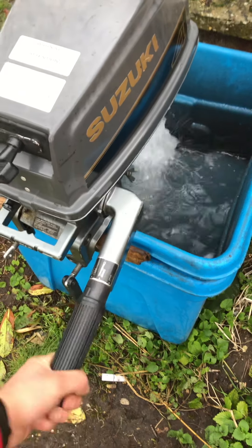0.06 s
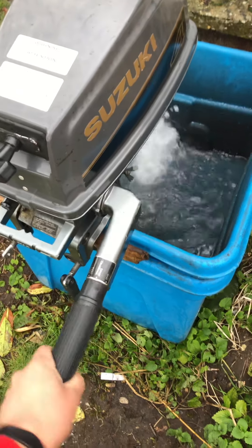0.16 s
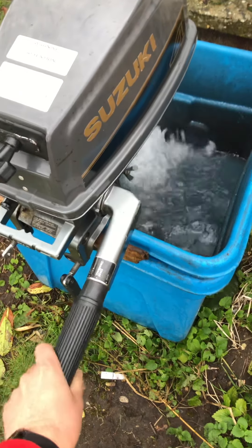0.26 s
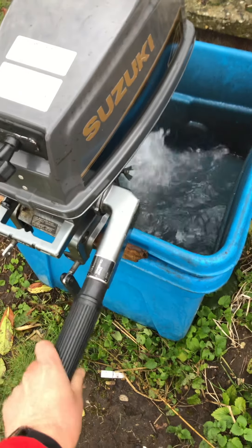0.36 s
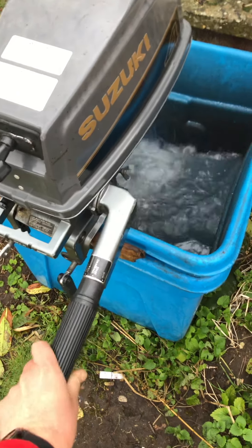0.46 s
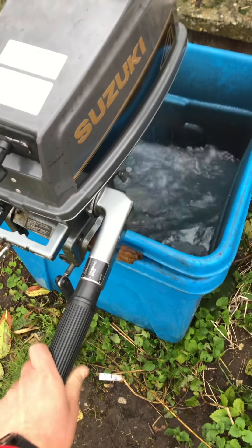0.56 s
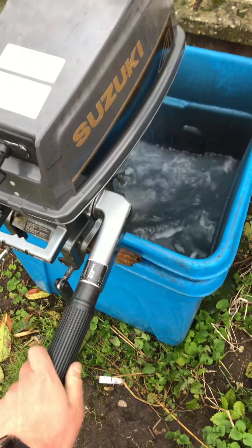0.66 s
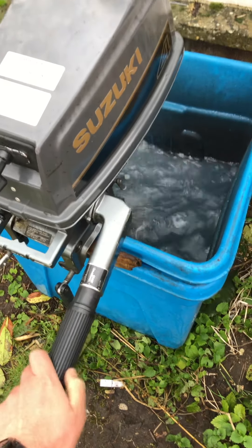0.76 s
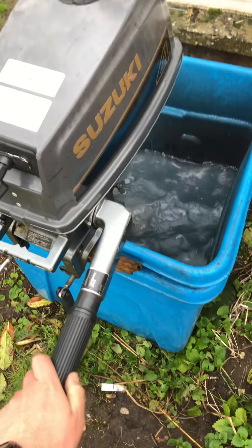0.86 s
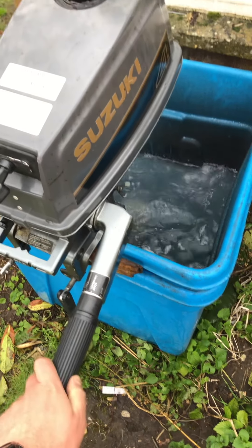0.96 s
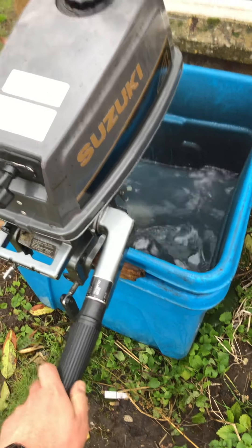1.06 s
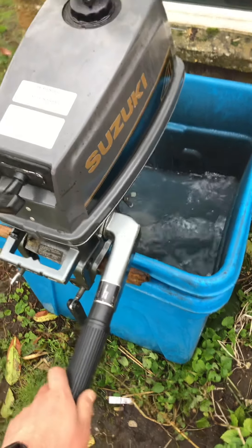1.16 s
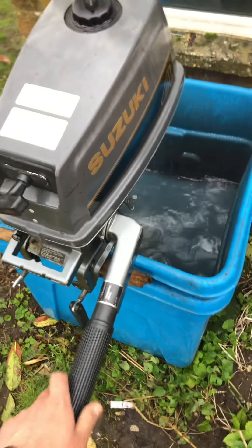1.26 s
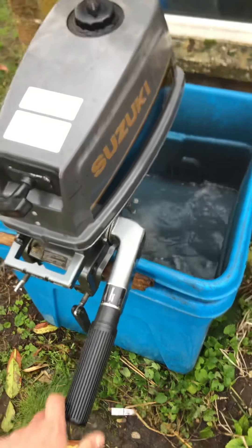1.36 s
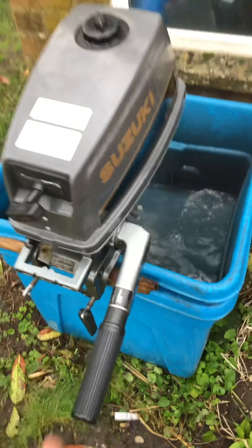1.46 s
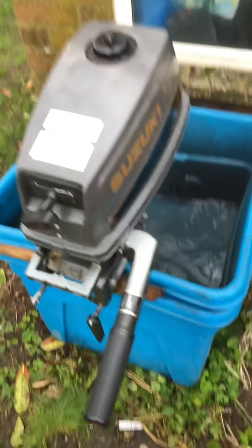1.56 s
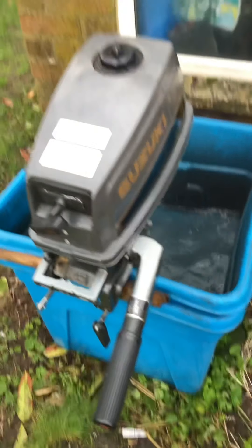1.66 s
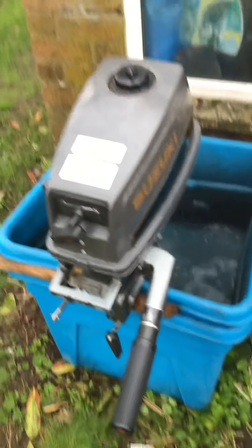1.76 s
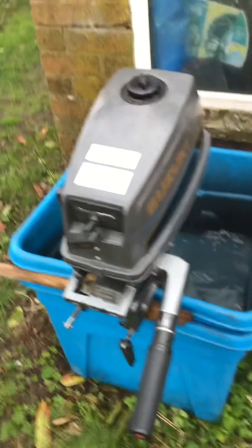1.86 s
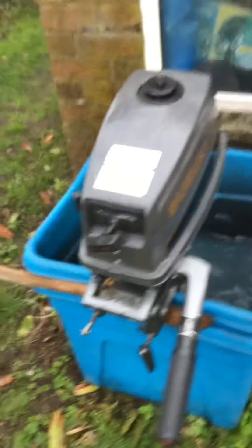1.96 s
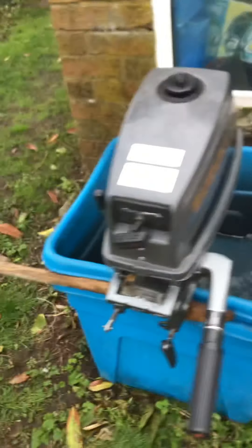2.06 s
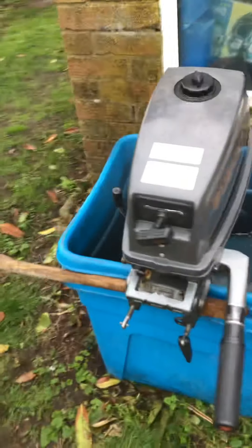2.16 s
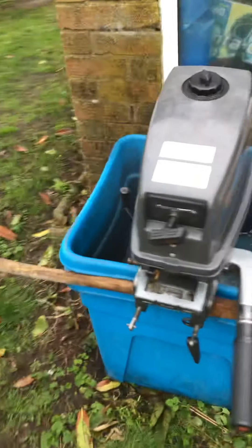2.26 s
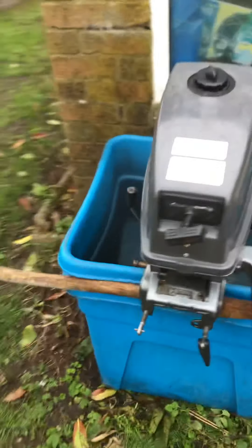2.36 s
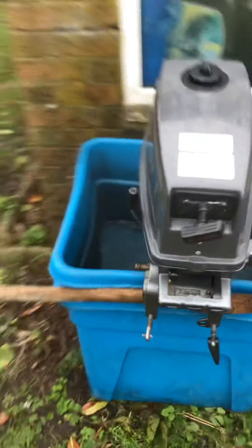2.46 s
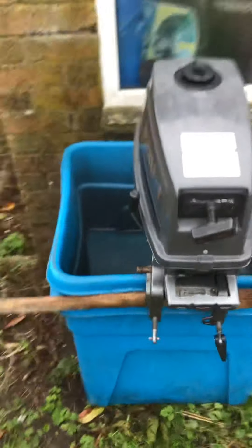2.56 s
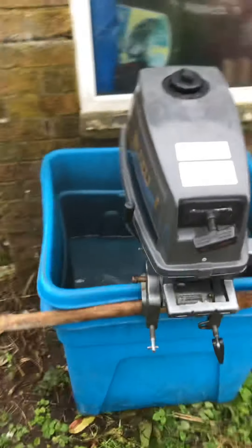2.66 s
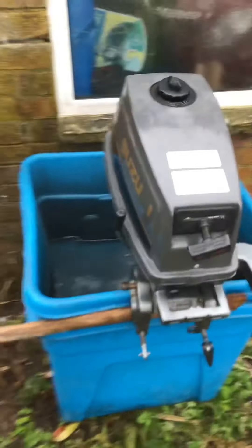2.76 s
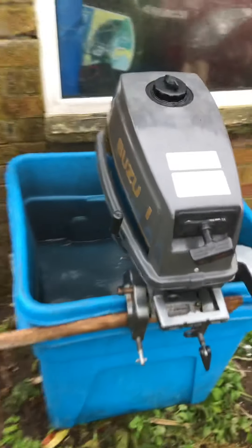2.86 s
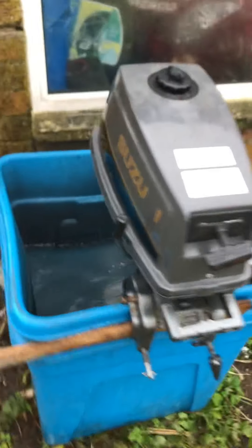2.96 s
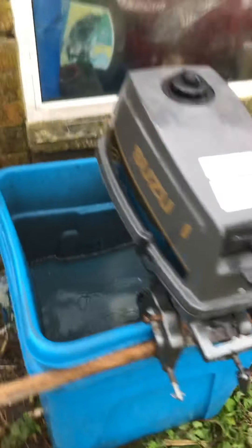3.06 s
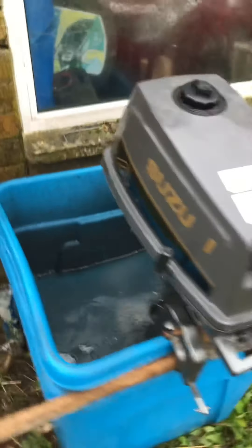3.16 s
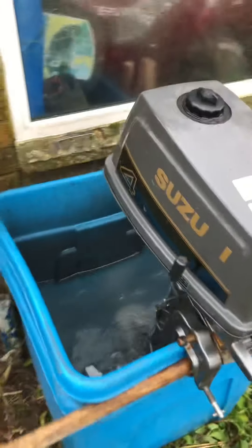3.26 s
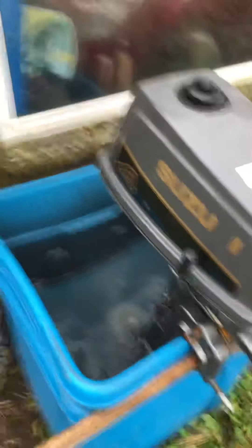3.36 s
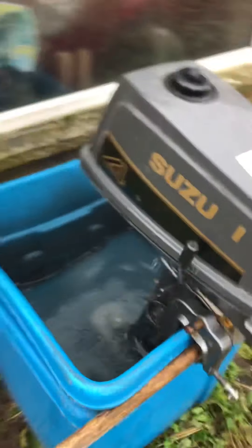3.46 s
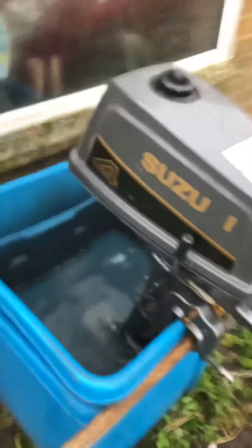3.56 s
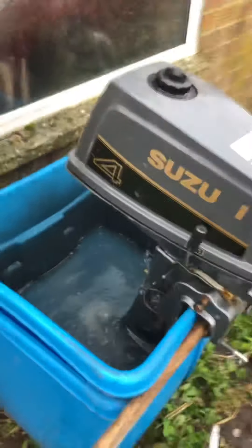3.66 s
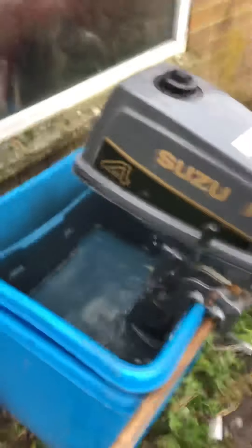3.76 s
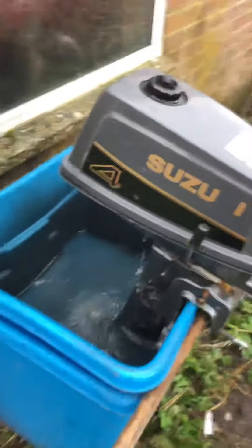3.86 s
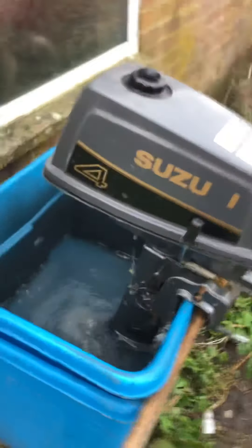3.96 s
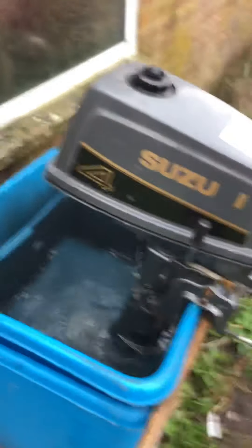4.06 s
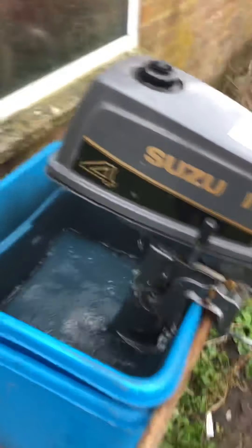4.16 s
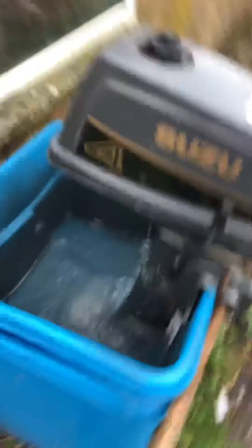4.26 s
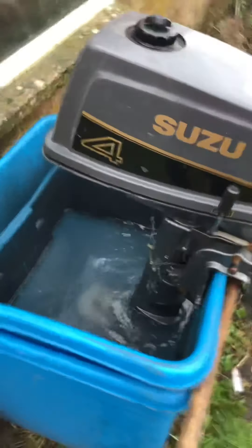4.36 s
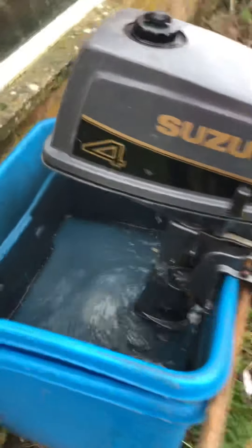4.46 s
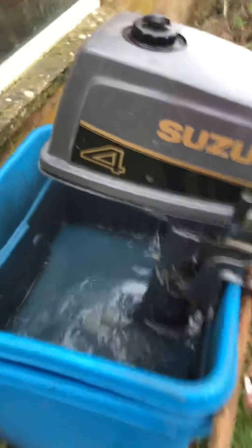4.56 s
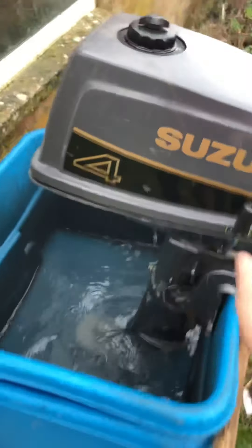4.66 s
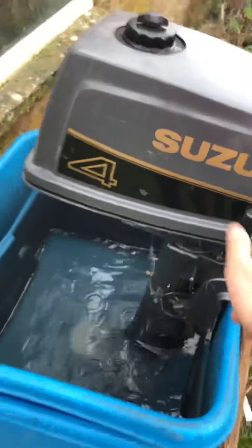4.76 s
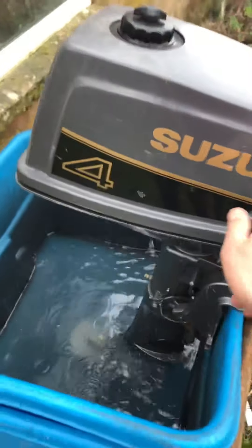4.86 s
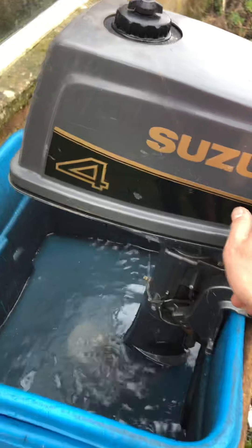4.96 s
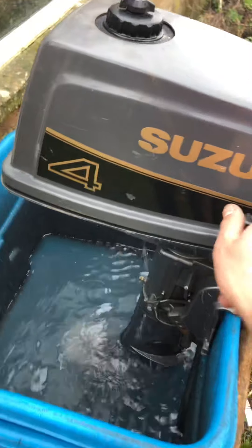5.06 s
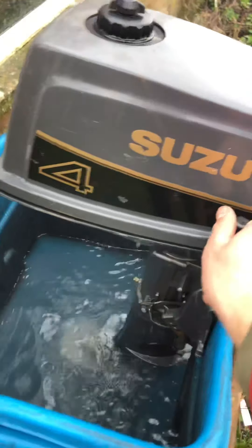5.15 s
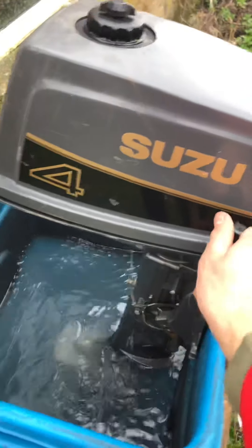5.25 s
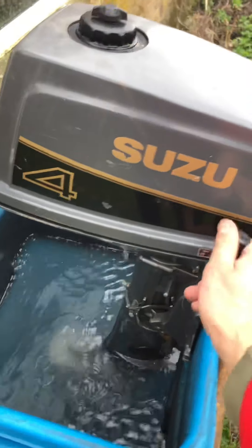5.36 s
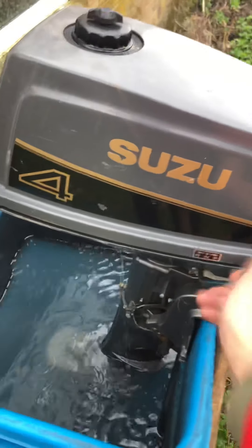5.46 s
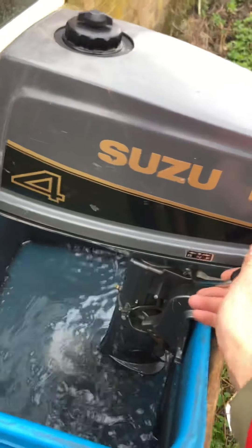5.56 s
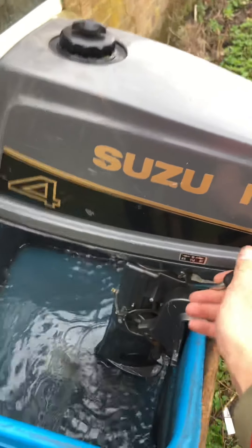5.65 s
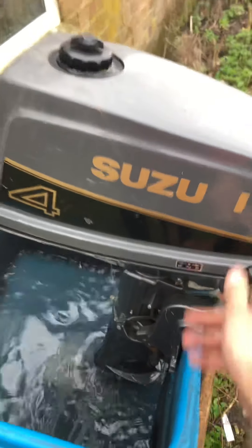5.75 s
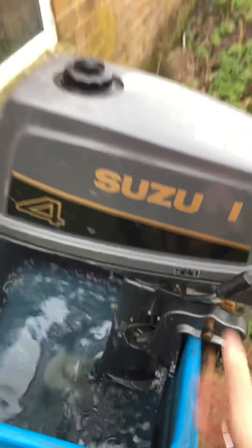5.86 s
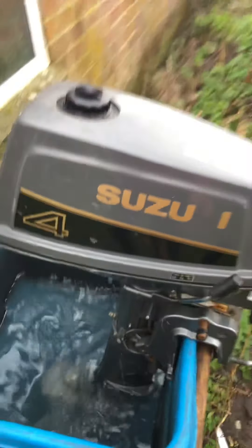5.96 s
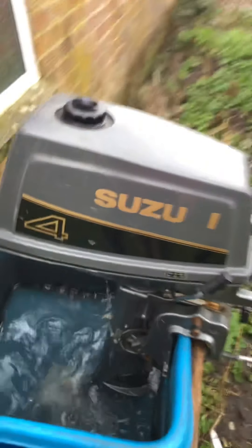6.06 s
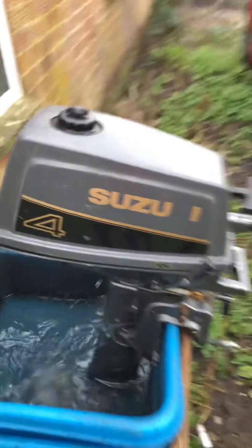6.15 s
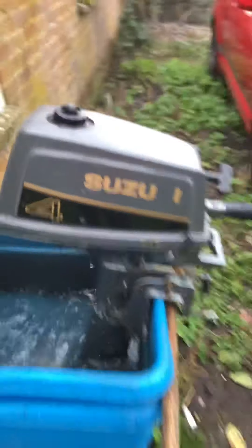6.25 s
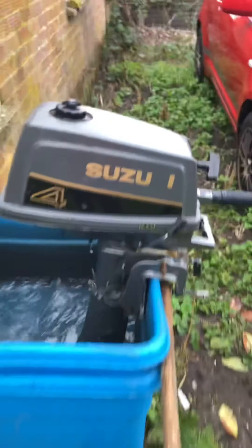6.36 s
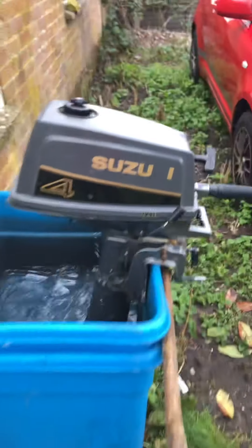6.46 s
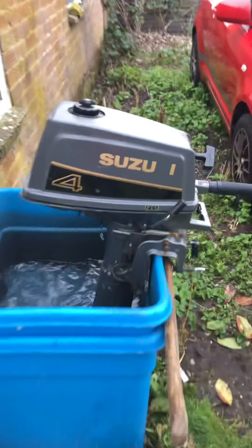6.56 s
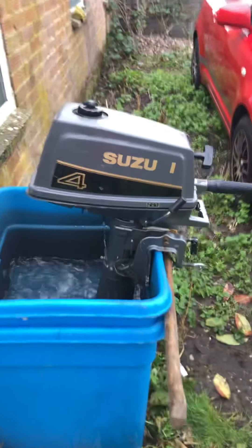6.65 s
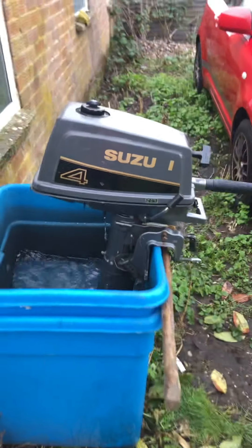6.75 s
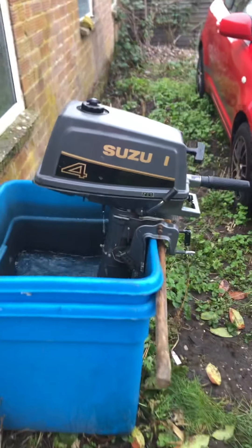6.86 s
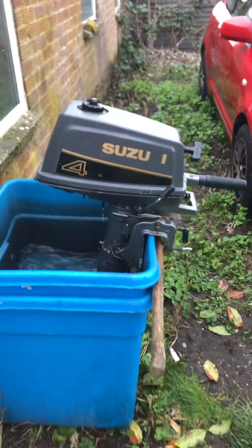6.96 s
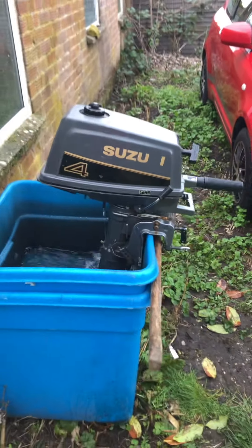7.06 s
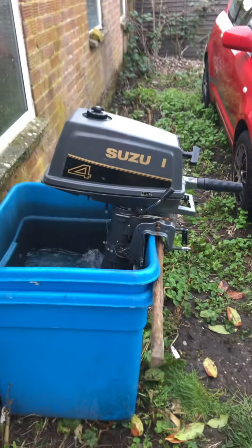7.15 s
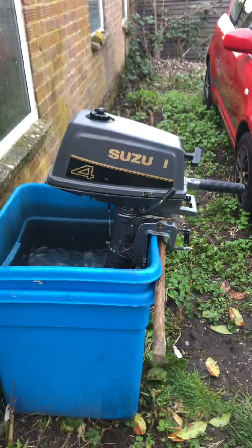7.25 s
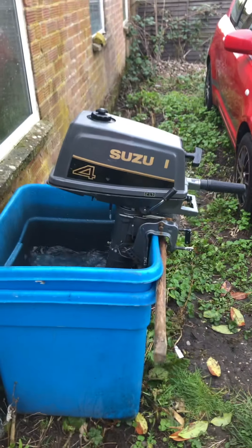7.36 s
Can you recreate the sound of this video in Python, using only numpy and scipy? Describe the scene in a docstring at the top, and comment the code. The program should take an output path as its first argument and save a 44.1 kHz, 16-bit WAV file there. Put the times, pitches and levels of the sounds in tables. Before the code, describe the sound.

A small two-stroke outboard motor runs in a tub of water outdoors, heard from a close, moving microphone. It is already revving at the start, peaking around 0.15 seconds, with sharp knocks from its loose cover and a gust of wind on the microphone. High, hissing spray lasts until about 0.9 seconds. The engine note falls steadily, booming hollowly in the tub as it slows. From about 2.4 seconds it breaks into a lumpy idle: low, bubbly exhaust chugs and light metallic ticks, with some strokes firing in a sharp, ringing hiss, roughly six a second and unevenly spaced. The cover keeps rattling and the water gurgles softly throughout, over a low rumble. Brief wind buffets return near 1.4, 2.6, 3.4, 5.4 and 6.3 seconds. From about 6 seconds, drips and fine spatter join as the slightly softer idle continues to the end at around 7.4 seconds.

```python
"""A small two-stroke outboard in a tub of water drops from a rev to a lumpy idle as the microphone moves round it.
First the rev throws up spray and shakes the loose cowl, and wind buffets the microphone.
Then the engine runs down, its crank harmonics booming as they glide through the tub's resonances.
From 2.4 s each turn only chugs out an exhaust bubble; some turns fire with a sharp hiss.
The cowl rattles and water gurgles throughout; after 6 s drips and spatter join in."""
import sys
import numpy as np
from scipy import signal
from scipy.fft import rfft, irfft
from scipy.io import wavfile
from scipy.ndimage import uniform_filter1d

SR = 44100
rng = np.random.default_rng(int(sys.argv[2]) if len(sys.argv) > 2 else 0)


def log_audio(samples):
    """Write samples as a 16-bit WAV file to the path given in sys.argv[1]."""
    # one column per channel
    frames = np.atleast_2d(samples).T
    # limit to full scale, then quantise
    limited = np.clip(frames, -1, 1)
    pcm = np.round(limited * 32767).astype(np.int16)
    wavfile.write(sys.argv[1], SR, pcm)


N = 327222
T = np.arange(N) / SR

# the crank running down: time_s, turn_rate_hz, low_orders_db, high_orders_db
RUNDOWN = [(0.0, 82.6, -16, -11), (0.09, 89.75, -10.5, -14), (0.15, 93.5, -14.5, -6.5),
           (0.25, 87.7, -10, -10.5), (0.45, 81.2, -12.5, -16.5), (0.65, 74.57, -17.5, -17.5),
           (0.82, 70.05, -18.5, -16.5), (0.99, 63.4, -17, -31), (1.28, 56.9, -17.5, -18),
           (1.58, 49.46, -22.5, -22.5), (1.85, 43.2, -20.5, -36), (2.31, 33.8, -32, -39),
           (2.4, 32.06, -34, -36)]
# crank orders one to six: level_db
LOW_ORDERS = [2.5, 0.8, -4.5, -2.5, -5, -11]
# what the tub passes of the low orders: frequency_hz, gain_db
TUB_RESPONSE = [(55, -33), (65, -25), (71, -9.5), (82, -11.5), (89, -23), (102, -8), (115, -3), (140, 0.5),
                (175, -1.5), (205, -5), (240, -6), (285, -8.5), (335, -8.5), (380, -13.5), (440, -3),
                (520, -5)]
# resonances of the tub and the motor's leg: centre_hz, width_hz, gain_db
TUB_MODES = [(309.2, 90, -5), (444.9, 82.3, -0.5), (677, 108, -4.5), (880, 73, -27), (1056, 120, -13),
             (1380, 54, -7.5), (1805, 110, -7.5)]
def rundown():
    """Forced resonance lifts each harmonic that glides through a mode. Returns sound, turns and fade."""
    crank_hz, low_db, high_db = columns(RUNDOWN)
    turns = np.cumsum(crank_hz * (1 + .002 * walk(20))) / SR
    low = high = 0
    for k, db in enumerate(LOW_ORDERS):
        tub_db = at((k + 1) * crank_hz, TUB_RESPONSE)
        flutter_db = (0.66 + 0.76 * k) * walk(24.8)
        low += undb(low_db + db + tub_db + flutter_db) * np.sin(2 * np.pi * (k + 1) * turns + k)
    for order in range(7, 30):
        lift = sum(undb(db) / (1 + (2 * (order * crank_hz - hz) / width) ** 2) ** 1.01
                   for hz, width, db in TUB_MODES)
        gain = lift * undb(2 * walk(10) - .25 * order)
        high += gain * np.sin(2 * np.pi * (order * turns + rng.random()))
    fade = np.clip((2.42 - T) / 0.027, 0, 1)  # the turns part into single chugs
    return np.sqrt(2) * fade * (low + undb(high_db - 6.5) * high), turns, fade


# turns that fire: start_s, puff_db, ring_db, hold_s, bubble_db, bubble_hz
FIRED_TURNS = [(1.57, -21, -23, 0.011, -42, 200), (2.024, -21, -36, 0.013, -40, 200.3),
               (2.1594, -23.5, -38, 0.01, -42, 201), (2.2734, -18, -20.5, 0.01, -30, 202),
               (2.429, -14, -24, 0.0064, -36, 180), (2.635, -17, -21.5, 0.0085, -27, 208),
               (2.817, -17.5, -20.5, 0.014, -27, 190), (2.9823, -17.5, -20, 0.011, -22, 173),
               (3.159, -16.5, -20, 0.014, -22, 183), (3.3414, -14.5, -20, 0.01, -20.5, 190),
               (3.538, -11, -20, 0.0047, -25, 190), (3.689, -15, -20, 0.012, -26, 180),
               (3.7987, -18, -19, 0.012, -27, 190), (3.9107, -13.5, -23, 0.0088, -21.5, 202),
               (4.024, -30, -34, 0.012, -28, 160), (4.085, -13.5, -20, 0.007, -21, 217),
               (4.199, -31, -34, 0.014, -27, 162), (4.2633, -13.5, -33, 0.0086, -24.5, 204),
               (4.44, -11, -32, 0.0088, -19.5, 199), (4.617, -10.5, -31, 0.0082, -18, 206),
               (4.7908, -14, -21, 0.01, -20, 191), (4.9554, -13.5, -13.5, 0.02, -21, 204),
               (5.1207, -9.5, -16, 0.0098, -17.5, 200), (5.2842, -8.5, -28, 0.0069, -17, 195),
               (5.388, -26.5, -20, 0.0096, -23, 150), (5.4483, -10.5, -17, 0.014, -19.5, 147),
               (5.635, -12.5, -11, 0.0093, -20, 184), (5.7625, -12.5, -20, 0.0092, -25, 193),
               (5.898, -9, -18.5, 0.0026, -21.5, 205), (6.04, -16, -27, 0.013, -23.5, 210),
               (6.11, -30, -35, 0.008, -20, 172), (6.171, -14, -26, 0.022, -27, 200),
               (6.227, -31, -34, 0.012, -32, 200), (6.322, -15.5, -40, 0.0059, -23.5, 191),
               (6.376, -21.5, -40, 0.0064, -40, 170), (6.4585, -13, -29, 0.011, -30, 232),
               (6.598, -16, -20, 0.012, -38, 190), (6.7335, -15, -40, 0.0043, -24.5, 218),
               (6.861, -15, -40, 0.0048, -25, 175), (6.988, -18, -24, 0.011, -32, 172),
               (7.056, -27, -27, 0.013, -40, 168), (7.113, -22, -25, 0.017, -29, 195),
               (7.248, -18, -21, 0.012, -26.5, 199), (7.3757, -17, -40, 0.0073, -26, 202)]
# spectrum of a puff of gas: frequency_hz, density_db
PUFF_SPECTRUM = [(880, 0.5), (1500, 2), (2120, -0.5), (2390, 6), (2910, 0), (4240, -1), (5280, 0),
                 (5710, 0.5), (7540, 1), (13400, -11), (16000, -16)]
# cylinder modes: pitch_hz, level_db, t60_s
CYLINDER_MODES = [(711, -5, 0.034), (890, -8, 0.13), (1842, -4, 0.028), (2389, -4.5, 0.06),
                  (3135, -9.5, 0.038), (3470, -10.5, 0.091), (4130, -2.5, 0.034), (5060, -5, 0.021),
                  (5704, 2, 0.031), (6200, -6, 0.031), (6700, -4, 0.033), (7780, 4, 0.034),
                  (8100, -2.5, 0.033), (8820, 0.5, 0.041), (10060, -6, 0.02), (10700, -4.5, 0.021),
                  (12440, -1, 0.018), (14000, -7, .018)]
# knock of the lowest cylinder modes: time_s, level_db
CYLINDER_KNOCK = [(2.1, -39), (2.35, -18), (3.2, -19.5), (3.6, -28), (4.2, -29), (5.5, -25), (6.2, -28.5),
                  (6.7, -32), (7.4, -46)]
def firings():
    """Impulse excitation: a puff of gas, with a tail of echo from tub and wall, rings the cylinder."""
    envelope, rings = np.zeros((2, N))
    t = np.arange(int(.2 * SR)) / SR
    for s, puff_db, ring_db, hold_s, *_ in FIRED_TURNS:
        after = np.maximum(t - abs(hold_s), 0)
        decay = 0.41 * np.exp(-t / 0.0019) + np.exp(-after / 0.013) + 0.13 * np.exp(-after / 0.01)
        add(envelope, s - .0015, undb(puff_db - 13) * (1 - np.exp(-t / 0.0024)) * decay)
        knock_db = at(s, CYLINDER_KNOCK)
        for hz, mode_db, t60 in CYLINDER_MODES:
            strength, detune, phase, delay = rng.standard_normal(4)
            band_db = knock_db - 0.5 if hz < 1000 else ring_db - 5.5 if hz < 2700 else puff_db - 18.5
            tone = ring(hz * (1 + 0.0304 * detune), t60, rise_s=0.0035, phase=phase)
            add(rings, s + 0.002 * abs(delay), undb(band_db + mode_db + 2.43 * strength) * tone)
    return envelope * coloured(PUFF_SPECTRUM) * undb(0.43 * walk(370)) + rings


# the crank at idle: time_s, turn_rate_hz
IDLE_SPEED = [(2.55, 29), (2.9, 24), (3.3, 21.5), (3.6, 19.5), (4.0, 17.5), (5.5, 17), (5.8, 15),
              (7.42, 15)]
def unfired_turns():
    """Angle is the integral of speed. Returns start_s, turns_since_firing for turns between firings."""
    crank_hz, = columns([row[:2] for row in RUNDOWN] + IDLE_SPEED)
    angle = np.cumsum(crank_hz) / SR
    fired = np.interp([row[0] for row in FIRED_TURNS], T, angle)
    rows = []
    for first, last in zip(fired, fired[1:]):
        count = int(round(last - first))
        rows += [(np.interp(first + (last - first) * k / count, angle, T), k) for k in range(1, count)]
    return np.array(rows)


# strength of a turn: time_s, unfired_bubble_db, piston_slap_db
TURN_LEVELS = [(1.799, -58, -25), (1.9, -60, -20), (2.33, -60, -21.5), (2.37, -23, -20.5),
               (2.6, -35, -20.5), (3.0, -22, -22.5), (3.35, -16.5, -22.5), (3.65, -32, -25.5),
               (4.2, -25, -24.5), (5.1, -22.5, -22), (5.5, -20.5, -24), (6.0, -22, -26), (6.3, -29, -40),
               (6.6, -50, -50), (7.2, -28.5, -50)]
def exhaust_bubbles(unfired):
    """Pulsed flow sheds a bubble a turn. Returns start_s, level_db, pitch_hz for each."""
    s, since_firing = unfired.T
    level_scatter, pitch_scatter = rng.standard_normal((len(s), 2)).T
    # as unfired turns follow one another, their bubbles come earlier, weaker and lower
    start_s = s + 0.0151 - 0.0054 * np.minimum(since_firing - 1, 3)
    sag = np.minimum(since_firing - 1, 2)
    level_db = at(s, TURN_LEVELS) - 3.5 * sag + 1.1 * level_scatter
    pitch_hz = 175.5 - 8.7 * sag + 5 * pitch_scatter
    fired = [(start + 0.00708, db, hz) for start, *_, db, hz in FIRED_TURNS]
    return fired + list(zip(start_s, level_db, pitch_hz))


def chugs(bubbles):
    """Bubble resonance: each pocket of exhaust swells into a low tone that sags in pitch."""
    out = np.zeros(N)
    for s, db, hz in bubbles:
        phase, length = rng.random(2)
        t60 = 0.086 * (0.81 + 0.32 * length)
        add(out, s - .004, undb(db) * ring(hz, t60, rise_s=.006, glide=-1.5, phase=phase))
    return out


def piston_slap(unfired):
    """Impact: just before the port opens, the piston strikes two metallic tones and a burst of noise."""
    tones, envelope = np.zeros((2, N))
    lead_s, pitches_hz = .01, [1505, 1720, 1837, 1906]
    for s in np.r_[unfired[:, 0], [row[0] for row in FIRED_TURNS]] - lead_s:
        phase, interval, which, size = rng.random(4)
        db = at(s, TURN_LEVELS, column=2) + 2.3 * (size - .5)
        hz = pitches_hz[int(which * len(pitches_hz))]
        upper_hz = hz * (1.2 + 0.62 * interval)
        add(tones, s, undb(db - 7) * ring(hz, t60=0.044, rise_s=0.00075, phase=phase))
        add(tones, s, undb(db - 13.5) * ring(upper_hz, t60=0.037, rise_s=0.001, phase=phase))
        add(envelope, s, undb(db - 14) * die_away(0.0064))
    return tones + envelope * unit(resonate(resonate(rng.standard_normal(N), 2600, 2400), 2200, 2400))


def idle_kicks(bubbles):
    """Damped vibration: the envelope of the shake that each chug gives after the run-down."""
    out = np.zeros(N)
    for s, *_ in bubbles:
        if s > RUNDOWN[-1][0]:
            add(out, s, die_away(.02, samples=int(.1 * SR)))
    return out


# running noise as the microphone moves round: time_s, rattle_db, gas_db, hollow_db, rumble_db
RUNNING_LEVELS = [(0.0, -17, -21, -16.5, -18), (0.37, -22.5, -25.5, -34, -44.5),
                  (0.95, -27, -33, -34.5, -49), (1.47, -26, -34, -31, -31.5),
                  (1.92, -31.5, -40, -33, -46.5), (2.4, -35, -45, -35.5, -49),
                  (3.0, -34.5, -47, -40.5, -47), (3.5, -34.5, -47, -38, -48),
                  (4.05, -35, -45.5, -44, -46.5), (5.1, -32.5, -43, -37.5, -44),
                  (5.9, -35, -47.5, -41, -44), (6.2, -32, -42, -41.5, -47), (6.55, -34.5, -43, -41.5, -49),
                  (6.9, -36.5, -49, -45.5, -48.5), (7.42, -34.5, -40, -42, -52)]
# rattling modes of the cowl: centre_hz, width_hz, level_db
COWL_MODES = [(902, 84, 2), (1256, 132, 1), (1429, 140, -1), (1867, 290, 0), (2410, 510, -0.5),
              (3010, 620, -10.5)]
# lowest, hollow modes of the cowl panels: centre_hz, width_hz, level_db
PANEL_MODES = [(645.6, 60, -1), (442, 72, -5)]
def cowl_rattle(beat):
    """Modal vibration: loose parts knock the cowl, hardest just after each turn."""
    rattle_db, _, hollow_db, _ = columns(RUNNING_LEVELS)
    rattle = clatter(COWL_MODES, beat, knocks_per_s=120) * undb(rattle_db - 1.6)
    return rattle + clatter(PANEL_MODES, beat, knocks_per_s=60) * undb(hollow_db + 1)


# short bursts of noise in the first second: start_s, level_db
EARLY_BURSTS = [(0.074, -10), (0.13, -8.5), (0.1694, -24), (0.185, -11), (0.9581, -21)]
def early_bursts():
    """Broad spectra: each burst is a short, quickly dying puff of wide-band noise."""
    envelope = np.zeros(N)
    for s, db in EARLY_BURSTS:
        add(envelope, s, undb(db - 5) * die_away(0.0058))
    return envelope * unit(resonate(rng.standard_normal(N), 3800, 2800))


# spectrum of the gas hiss: frequency_hz, density_db
GAS_SPECTRUM = [(1470, 4), (2500, -11), (2840, -11), (3720, -3), (5020, -8), (5560, -4.5), (8170, -17.5),
                (9000, -35.5), (11700, -62), (19800, -120)]
# casing resonances in the hiss: centre_hz, width_hz, level_db
CASING_MODES = [(3340, 110, 3.5), (3690, 120, 3), (4320, 37, 0.5), (4790, 320, 2), (5530, 290, 0),
                (6600, 150, -16), (7130, 220, 0.5)]
# thin top of the hiss: frequency_hz, density_db
THIN_HISS_SPECTRUM = [(4000, -30), (6500, -2), (8000, -2), (10000, -5), (11500, -17), (13500, -28),
                      (15800, -44)]
# treble of the engine: time_s, thin_hiss_db, upper_ring_db, lower_ring_db
TREBLE_LEVELS = [(1.0, -40, -62, -46), (1.46, -41, -53, -45), (1.98, -46, -55, -46), (2.39, -67, -64, -51),
                 (3.8, -54, -63, -67), (4.3, -56, -53.5, -66), (5.8, -52, -63, -68), (6.2, -55, -57, -66),
                 (7.42, -52, -60, -66)]
def gas_hiss(beat):
    """Flow noise: gas hisses in pulses with the turns, coloured by the casing's resonances."""
    gas_db, thin_db = columns(RUNNING_LEVELS)[1], columns(TREBLE_LEVELS)[0]
    flow = unit(coloured(GAS_SPECTRUM) * beat * undb(2.7 * walk(25)))
    casing = clatter(CASING_MODES, beat, knocks_per_s=150)
    thin = unit(coloured(THIN_HISS_SPECTRUM) * beat * undb(3 * walk(30)))
    return (0.74 * flow + 0.59 * casing) * undb(gas_db - 1.5) + thin * undb(thin_db - 9)


def metallic_rings(turns, fade, kicks):
    """Amplitude modulation: two thin, metallic bands of noise pulse with each turn."""
    _, upper_db, lower_db = columns(TREBLE_LEVELS)
    pulse = 0.31 + uniform_filter1d(kicks, size=700) + fade * np.exp(-(turns % 1) / 0.53)
    upper = undb(upper_db) * unit(noise_band(8780, 520) * pulse)
    return upper + undb(lower_db) * unit(noise_band(6400, 1000) * pulse)


# spectrum of the garden and the shaken tub: frequency_hz, density_db
RUMBLE_SPECTRUM = [(20, -30), (35, -21), (55, -3), (90, -1), (140, 3.5), (240, 3.5), (390, -11.5),
                   (650, -59)]
def tub_rumble(kicks):
    """Forced vibration: the low background noise swells as each chug shakes the tub."""
    rumble_db = columns(RUNNING_LEVELS)[3]
    return coloured(RUMBLE_SPECTRUM) * (0.55 + 0.65 * kicks) * undb(rumble_db + 14.5 + 1.5 * walk(8))


# spectrum of the spray: frequency_hz, density_db
SPRAY_SPECTRUM = [(3820, -27), (6500, -10), (7270, 4.5), (8460, -1), (9120, 3), (9710, -3.5), (12800, -7),
                  (14800, -15), (15800, -22)]
# spray thrown up by the rev: time_s, level_db
SPRAY_LEVEL = [(0, -29.5), (.25, -30.5), (.55, -31), (.7, -34.5), (.8, -32), (.92, -35.5), (.94, -79)]
def spray():
    """Incoherent sources sum to noise: the spray is one high, flickering hiss."""
    return coloured(SPRAY_SPECTRUM) * undb(at(T, SPRAY_LEVEL) + 1.4 * walk(21.86))


# wind on the microphone: start_s, length_s, level_db, bottom_hz, top_hz
WIND_GUSTS = [(0.058, 0.067, -18, 298, 1080), (0.097, 0.094, -8, 149, 337), (1.343, 0.32, -28, 62, 637),
              (2.649, 0.065, -23, 100, 785), (3.264, 0.02, -29, 100, 600), (3.34, 0.21, -29.5, 40, 553),
              (5.395, 0.072, -28, 60, 920), (4.5, 0.47, -44, 40, 120), (6.29, 0.3, -34.5, 50, 407),
              (6.787, 0.11, -35.5, 50, 493)]
def wind():
    """Turbulence at the microphone makes ragged bursts of low noise."""
    out = np.zeros(N)
    ragged = rng.standard_normal(N) * undb(4.5 * walk(110))
    for s, length_s, db, bottom_hz, top_hz in WIND_GUSTS:
        i, n = int(s * SR), int(length_s * SR)
        band = signal.butter(3, [bottom_hz, top_hz], "band", fs=SR, output="sos")
        burst = signal.sosfilt(band, ragged[i:i + n])
        add(out, s, undb(db) * unit(burst) * signal.windows.tukey(n, .4))
    return out


# big lone bubbles: start_s, level_db, pitch_hz, t60_s
LONE_BUBBLES = [(0.039, -9, 939, 0.17), (6.641, -20, 393, 0.064)]
# drips and slops, plus two short gliding tones that sound with the weak firings at 6.11 and 6.23 s: start_s,
# level_db, pitch_hz
WATER_DRIPS = [(6.112, -18, 964), (6.136, -20, 1410), (6.156, -17, 1000), (6.229, -16.5, 2720),
               (6.436, -22, 1800), (6.524, -19, 870), (6.661, -19, 716), (6.71, -27, 961),
               (6.781, -23, 1230), (7.044, -24, 1180), (7.211, -18.5, 736), (7.339, -21, 2810)]
def water():
    """Bubble resonance: gurgles, drips and a patter of small bubbles are damped tones that glide up."""
    out = np.zeros(N)
    for s, db, hz, t60 in LONE_BUBBLES:
        add(out, s, undb(db) * ring(hz, t60, rise_s=0.0016, glide=0.27))
    for s, db, hz in WATER_DRIPS:
        add(out, s, undb(db - 8) * ring(hz, t60=0.053, rise_s=0.00052, glide=1.5))
    for when, pitch, size in rng.random((250, 3)):
        hz = 350 * 2 ** (3 * pitch)
        bubble = ring(hz, t60=15 / hz, rise_s=0.00099, glide=hz / 90)
        add(out, when * N / SR, undb(-40.5 + 6 * size) * bubble)
    return out


def spatter(from_s=6.08):
    """Impact noise: thrown water lands in soft little bursts, each in its own band."""
    out = np.zeros(N)
    t = np.arange(1000) / SR
    shape = t / .002 * np.exp(1 - t / .002)
    for when, pitch, size in rng.random((420, 3)):
        hz = 2000 * 2 ** (2.1 * pitch)
        burst = unit(noise_band(hz, .45 * hz, len(t))) * shape
        add(out, from_s + when * (N / SR - from_s), undb(-49 + 9 * size) * burst)
    return out


def clatter(modes, beat, knocks_per_s):
    """Random excitation: each resonance takes its own scattered knocks over a smooth noise drive."""
    out = 0
    for hz, width, db in modes:
        knocks = (rng.random(N) < knocks_per_s / SR) * rng.standard_normal(N)
        drive = (unit(knocks) + 1.77 * rng.standard_normal(N)) * beat
        out += undb(db + 2.96 * walk(10)) * unit(resonate(drive, hz, width))
    return unit(out)


def ring(hz, t60, rise_s, glide=0, phase=0):
    """Damped oscillator: a tone swells, glides and dies; peak near 1, phase in cycles."""
    t = np.arange(int((abs(t60) + 3 * rise_s) * SR)) / SR
    shape = (1 - np.exp(-t / rise_s)) ** 2 * np.exp(-np.log(1000) * t / abs(t60))
    return shape / shape.max() * np.sin(2 * np.pi * (hz * t * (1 + glide * t) + phase))


def die_away(decay_s, samples=1000):
    """Exponential decay from 1."""
    return np.exp(-np.arange(samples) / SR / decay_s)


def resonate(x, hz, width_hz):
    """Second-order resonance."""
    return signal.lfilter(*signal.iirpeak(hz, hz / width_hz, SR), x)


def noise_band(hz, width_hz, samples=N):
    """Cascaded resonance: white noise passes twice through one resonator."""
    return resonate(resonate(rng.standard_normal(samples), hz, width_hz), hz, width_hz)


def coloured(spectrum):
    """Spectral shaping: noise of rms 1 from rows of frequency_hz, density_db."""
    hz, db = np.transpose(spectrum)
    bins_hz = np.arange(N // 2 + 1) * SR / N + 1
    gain = undb(np.interp(np.log(bins_hz), np.log(hz), db, -120, -120))
    return unit(irfft(rfft(rng.standard_normal(N)) * gain, N))


def walk(rate_hz):
    """Slow fluctuation: random steps smoothed twice; spread near 1."""
    hold = int(SR / rate_hz)
    steps = np.repeat(rng.standard_normal(N // hold + 1), hold)
    return 1.364 * uniform_filter1d(uniform_filter1d(steps, hold), hold)[:N]


def at(x, table, column=1):
    """Linear interpolation of one column against the first."""
    values = np.transpose(table)
    return np.interp(x, values[0], values[column])


def columns(table):
    """Linear interpolation of each column after time_s, sample by sample."""
    return [at(T, table, column) for column in range(1, len(table[0]))]


def add(out, s, piece):
    """Superposition: mix a short sound in at s seconds."""
    i = int(s * SR)
    piece = piece[:max(N - i, 0)]
    out[i:i + len(piece)] += piece


def undb(db):
    return 10 ** (np.asarray(db) / 20)


def unit(x):
    return x / np.sqrt(np.mean(x ** 2))


def scene():
    """Superposition: engine, wind and water sum in one channel."""
    boom, turns, fade = rundown()
    unfired = unfired_turns()
    bubbles = exhaust_bubbles(unfired)
    kicks = idle_kicks(bubbles)
    beat = 1 + fade * 0.44 * np.exp(-(turns % 1) / 0.37) + .3 * kicks  # swells with each turn
    running = cowl_rattle(beat) + gas_hiss(beat) + metallic_rings(turns, fade, kicks)
    tub = spray() + tub_rumble(kicks)
    strokes = chugs(bubbles) + firings() + piston_slap(unfired) + early_bursts()
    return (boom + running + tub + strokes + wind() + water() + spatter())[None]


def record(dry):
    """Soft saturation rounds the loudest peaks; a low-pass filter cuts above 16 kHz."""
    low_pass = signal.ellip(11, .2, 70, 16000, fs=SR, output="sos")
    return signal.sosfilt(low_pass, np.tanh(0.97 * dry))


dry = scene()
out = record(dry)
log_audio(out)
```